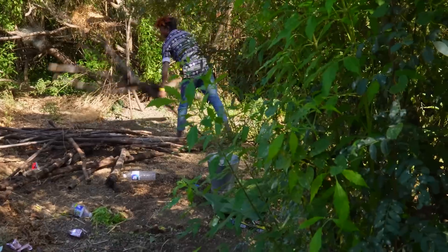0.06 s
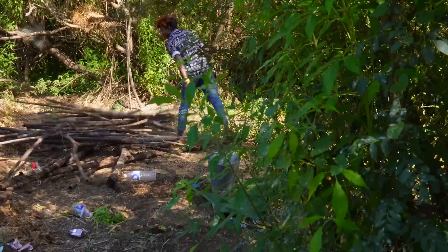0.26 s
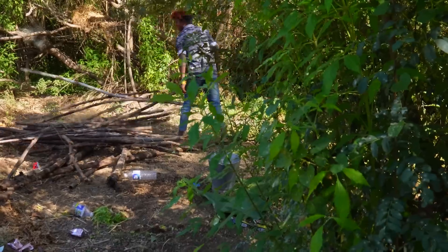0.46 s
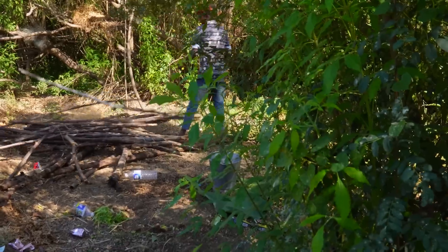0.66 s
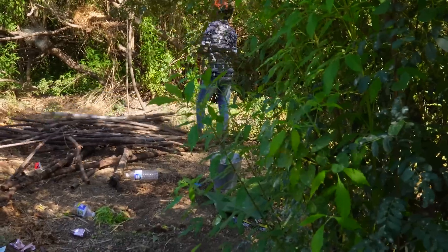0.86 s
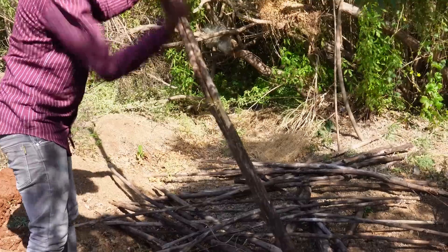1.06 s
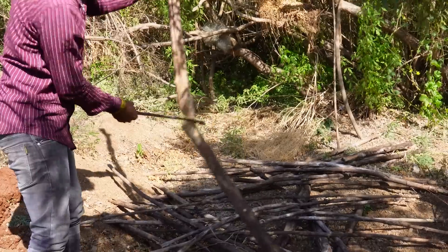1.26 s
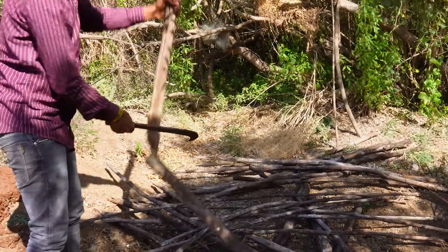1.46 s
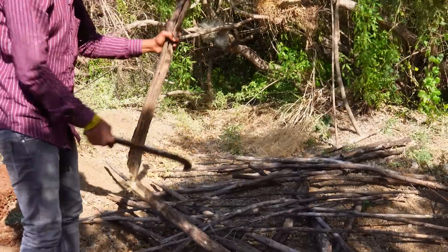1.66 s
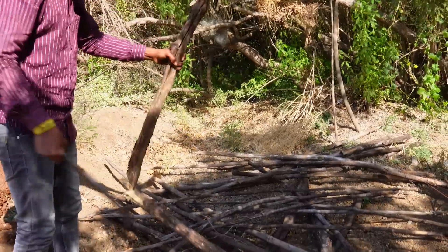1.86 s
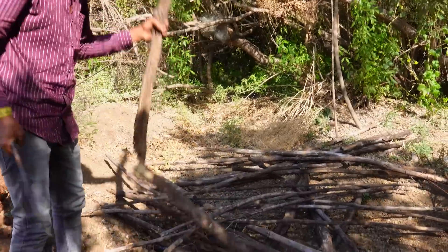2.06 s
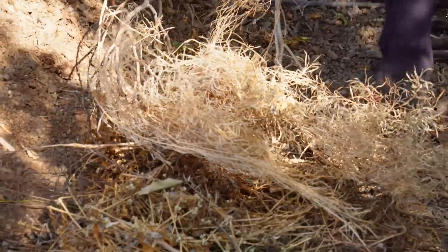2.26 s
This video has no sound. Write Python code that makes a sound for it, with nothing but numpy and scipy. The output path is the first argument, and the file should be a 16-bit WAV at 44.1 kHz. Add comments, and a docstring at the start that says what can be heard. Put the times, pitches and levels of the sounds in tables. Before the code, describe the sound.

Wooden poles clattering onto a heap, followed by one sharp, splintering chop.

```python
"""Dry branches land on a woodpile some metres away: poles knock, bounce and settle, twigs crackle.
Each contact rings a stick's bending modes and the pile beneath. The scene jumps close to a billhook
biting into a standing branch, which rings, cracks, tears and sheds splinters over stirring leaves and
faint distant notes, then jumps to a quiet patch of straw. Trees scatter the knocks and cracks back."""
import sys
import numpy as np
from scipy import signal
from scipy.fft import rfft, irfft
from scipy.io import wavfile
from scipy.ndimage import uniform_filter1d, minimum_filter1d

SR = 44100
rng = np.random.default_rng(int(sys.argv[2]) if len(sys.argv) > 2 else 0)


def wav_out(sig):
    """Save sig, one row per channel (or a flat mono array), as 16-bit PCM at SR to the path in sys.argv[1]."""
    wavfile.write(sys.argv[1], SR, np.round(np.clip(np.atleast_2d(sig).T, -1, 1) * 32767).astype(np.int16))


N = 101429
CHOP_SCENE_S, STRAW_SCENE_S = 1.021, 2.146

# poles landing (time [s], level [dB], hollow bass [dB], treble [dB], bounce length [s])
POLE_KNOCKS = [(0.069, -33, -12, 7.5, 0.019), (.188, -23.5, -27, 5, 0.012), (.219, -20.5, -10.5, -8, .008),
               (.225, -13.5, -16.5, 8, .012), (.237, -17, -16, -12, .004), (.268, -11.5, -7.5, 0, .012),
               (.278, -9.5, -1, -8, .012), (.289, -27, -9, 9, 0.007), (.303, -16.5, -12.5, 8, .012),
               (0.321, -22, 3.5, 15, 0.0047), (.344, -17.5, -8, 4, 0.016), (0.374, -17.5, -3, -8, .014),
               (.427, -40, 7, 1, 0.0082), (.434, -17.5, 1.5, -35, 0.0072), (.451, -18, 15, 9, 0.017),
               (.486, -20, -1.5, -37, 0.0072), (0.547, -19, -6, 0.5, 0.0037), (.565, -23.5, 6, 6.5, 0.007),
               (.607, -24, 16, 27, 0.0088), (0.625, -20, 2.5, 7, 0.016), (0.716, -21.5, 4.5, 1.5, .014),
               (0.76, -28.5, 13, -28, 0.0058), (0.776, -29.5, 14, -23, 0.0035),
               (.809, -23, 4, 11.5, 0.0089), (.826, -19.5, -3, 2, .02), (.842, -15, 4.5, -26, .016),
               (.973, -32, 8.5, -6, .01)]
# small contacts (time [s], stick clatter [dB], twig crackle [dB])
HEAP_SETTLING = [(0, -76, -70.5), (.07, -54.5, -65), (.18, -58.5, -58.5), (.215, -33, -36),
                 (.266, -26.5, -32), (.28, -19.5, -22), (.33, -18.5, -23), (.41, -27, -27.5),
                 (.47, -25.5, -30), (.535, -31, -38), (.63, -32.5, -31), (.69, -37.5, -33),
                 (.805, -41, -42), (.855, -32.5, -25), (.905, -40.5, -40), (1.02, -48, -47.5)]
# woodpile spectrum (frequency [Hz], gain [dB])
PILE_SPECTRUM = [(40, -59), (130, -57), (200, -32.5), (400, -23), (620, -12), (800, -1.5), (1100, 1),
                 (1650, 6.5), (1900, 0.5), (2250, 4), (3500, -2.5), (6300, -15.5), (10300, -28),
                 (16000, -41)]
# twig spectrum (frequency [Hz], gain [dB])
TWIG_SPECTRUM = [(100, -52), (1500, -6), (3500, 1), (5000, -3), (8000, -10.5), (12000, -21.5), (16000, -35)]


def thrown_branches(count=64):
    """Poles strike and bounce; lesser sticks clatter and twigs crackle as the heap settles."""
    sticks = [stick_contact() for _ in range(count)]
    wood = unit(response(PILE_SPECTRUM))
    knocks, clatter = np.zeros(N), np.zeros(N)
    for s, db, bass_db, treble_db, bounce_s in POLE_KNOCKS:
        first, *bounces = rng.integers(count, size=4)
        lags_s = (np.arange(3) + rng.random(size=3)) / 3 * bounce_s
        knock = sticks[first].copy()
        for bounce, lag_s in zip(bounces, lags_s):
            knock += undb(-4.5) * np.pad(sticks[bounce], (int(lag_s * SR), 0))[:len(knock)]
        tone = response([(450, bass_db), (900, bass_db / 2), (1600, 0), (2400, 0), (5500, treble_db)])
        add(knocks, s, blow(convolve(convolve(knock, wood), tone), db))
    contacts = grains(per_s=300, scatter_db=3.3) * undb(curve(HEAP_SETTLING))
    which = rng.integers(count, size=N)
    for i in np.flatnonzero(contacts):
        add(clatter, i / SR, contacts[i] * sticks[which[i]])
    crackle = grains(per_s=1500, scatter_db=2) * undb(curve(HEAP_SETTLING, column=2))
    twigs = convolve(crackle, unit(response(TWIG_SPECTRUM)))
    heap = knocks + convolve(clatter, wood) + twigs
    return trees(heap, far_db=-14.5, far_t60_s=.62, near_db=-9, near_t60_s=.09)


# woodpile modes (frequency [Hz], level [dB])
PILE_RESONANCES = [(490, 1.5), (867, -0.5), (1032, -6.5), (1104, 8), (1221, -8.5), (1303, -19), (1500, 1.5),
                   (1713, 6.5), (2160, 15), (2236, -9), (2691, -13), (2765, 11.5), (2966, 0), (3105, 0.5)]


def stick_contact():
    """A stick of random size rings in its bending modes, with the pile beneath, a click and scraping bark."""
    order = np.arange(3, 15) + .5
    stick_hz = np.minimum(22.03 * 2 ** rng.uniform(-.8, .803) * order ** 2, SR / 2)
    stick_gain = rng.standard_normal(len(order)) * np.sqrt(stick_hz) / (1 + (stick_hz / 4500) ** 2)
    bending = ring(stick_hz, stick_gain, t60_s=.056 * np.sqrt(1500 / stick_hz))
    pile_hz, pile_db = np.array(PILE_RESONANCES).T
    pile_gain = rng.standard_normal(len(pile_hz)) * undb(pile_db)
    pile = ring(pile_hz, pile_gain, t60_s=.11 * np.sqrt(1500 / pile_hz))
    bark_tone = response([(1500, -16.5), (4500, 1), (9000, 1.5), (16000, -3.5)])
    bark = unit(convolve(burst(t60_s=.045), bark_tone))
    click = burst(t60_s=.014)
    return unit(bending + undb(-12) * pile + undb(-11.5) * click + undb(1) * bark)


# blade bite, then cracks (time [s], level [dB], branch ring [dB], treble [dB])
BRANCH_CRACKS = [(1.1896, -16.5, -22.5, 3), (1.2065, -18, -27.5, 3), (1.2523, -6.5, -37, -1),
                 (1.274, -24, -50, 6), (1.3215, -30.5, -71, 7), (1.354, -37, -57, -19),
                 (1.3817, -31.5, -65, 5.5), (1.3863, -34.5, -61, 0)]
# crack spectrum (frequency [Hz], gain [dB])
CRACK_SPECTRUM = [(50, -62.5), (130, -48.5), (300, -36), (700, -20.5), (1200, -12.5), (2300, -4.5),
                  (3300, -6), (4300, 2), (5200, -5), (7500, -12), (11000, -22.5), (16000, -31)]
# standing branch modes (frequency [Hz], level [dB], t60 [s])
BRANCH_RESONANCES = [(210, -9, .22), (335, -1, .06), (445, -4, .2), (640, -9, .06), (861, -1, .1),
                     (1060, -8, .2), (1157, 1, .1), (1420, -3, .1), (1637, -2, .07), (1814, -3, .06),
                     (2132, -3, .07), (2250, -2, .1), (2573, -6, .08), (2988, -4, .14)]
# faint after-ring of the wood (frequency [Hz], level [dB])
AFTER_RING_MODES = [(385, -21), (420, -15.5), (1045, -6), (1071, 0.5), (1190, -4), (1437, 0)]
# tearing fibres (time [s], level [dB])
FIBRE_TEARING = [(1.186, -62), (1.191, -34), (1.203, -32), (1.218, -24), (1.228, -18), (1.243, -19.5),
                 (1.25, -33), (1.27, -31.5), (1.29, -22.5), (1.32, -32.5), (1.35, -40.5), (1.41, -48.5),
                 (1.52, -64), (1.8, -79), (2.15, -87.5)]
# fibre spectrum (frequency [Hz], gain [dB])
FIBRE_SPECTRUM = [(100, -45), (500, -28), (1200, -15), (2500, -3), (4300, 0.5), (6000, -9), (9000, -13.5),
                  (12000, -21), (16000, -36)]


def chopped_branch():
    """The blade rings the branch; the wood splits in sharp cracks with fibres tearing in between."""
    hz, mode_db, t60_s = np.array(BRANCH_RESONANCES).T
    wood, out = unit(response(CRACK_SPECTRUM)), np.zeros(N)
    radiation = response([(40, -28), (120, -26), (220, -13), (5000, 15)])  # thin pole: little bass
    for s, db, ring_db, treble_db in BRANCH_CRACKS:
        split = undb(-5) * burst(t60_s=.0032) + burst(t60_s=.0022, hold_s=.0035)
        crack = convolve(convolve(split, wood), response([(3500, 0), (9000, treble_db)]))
        modes = ring(hz, undb(mode_db) * rng.choice([-1, 1], len(hz)), t60_s)
        add(out, s, blow(crack, db) + blow(convolve(modes, radiation), ring_db))
    after_hz, after_db = np.array(AFTER_RING_MODES).T
    after_ring = ring(after_hz, undb(after_db), t60_s=np.full(len(after_hz), 1.1), size=SR)
    add(out, BRANCH_CRACKS[0][0], blow(after_ring, db=-36.5))
    fibres = grains(per_s=7000, scatter_db=3.5) * undb(curve(FIBRE_TEARING))
    out += convolve(fibres, unit(response(FIBRE_SPECTRUM)))
    return trees(out, far_db=-21.5, far_t60_s=.9, near_db=-10.5, near_t60_s=.17)


# splinters and straw (time [s], level [dB], pitch [Hz])
DRY_SNAPS = [(1.342, -43, 4400), (1.4253, -43.5, 3740), (1.4594, -43.5, 3000), (1.4957, -45.5, 4000),
             (1.549, -46.5, 4280), (1.5864, -50.5, 6260), (1.6476, -50, 3400), (1.6926, -51.5, 2520),
             (1.7599, -50.5, 3580), (1.768, -52, 5000), (1.8299, -56, 6500), (1.855, -50.5, 4880),
             (1.8721, -48, 4220), (2.167, -58, 1510), (2.214, -56, 3500), (2.238, -59, 4000),
             (2.281, -59.5, 1290)]


def splinters():
    """Splinters and straw snap singly, each a noise burst with its own pitch."""
    out = np.zeros(N)
    for s, db, hz in DRY_SNAPS:
        tone = response([(100, -42), (hz / 8, -27), (hz / 3, -11), (hz, 0), (hz * 2, -11), (16000, -29)])
        add(out, s, blow(convolve(burst(t60_s=.019), tone), db))
    return trees(out, far_db=-20, far_t60_s=.46, near_db=-2.5, near_t60_s=.14)


# leaves stirring (time [s], level [dB])
LEAF_RUSTLE = [(1.3, -80), (1.45, -56), (1.7, -59), (1.82, -63), (1.93, -68), (1.98, -59), (2.0, -47),
               (2.04, -58), (2.07, -62), (2.105, -55), (2.15, -61)]
# leaf spectrum (frequency [Hz], gain [dB])
LEAF_SPECTRUM = [(100, -32), (600, -27), (1300, -13.5), (1900, -13.5), (2800, -3), (4600, -7),
                 (6500, -16.5), (10000, -29.5), (16000, -40)]


def dry_leaves():
    """Leaves stir underfoot in a soft rustle of tiny clicks."""
    clicks = grains(per_s=4600, scatter_db=3.1) * undb(curve(LEAF_RUSTLE))
    return convolve(clicks, unit(response(LEAF_SPECTRUM)))


# distant notes (start [s], length [s], pitch [Hz], level [dB], third harmonic re fundamental [dB])
CALL_NOTES = [(1.0, .19, 1870, -63, -30), (1.96, .08, 692, -60, -14), (2.015, .075, 690, -66, 6),
              (2.045, .1, 810, -63, -14)]


def distant_call():
    """Thin, rough notes far away, each swelling and fading."""
    out = np.zeros(N)
    for s, length_s, hz, db, third_db in CALL_NOTES:
        waver = .25 * uniform_filter1d(rng.standard_normal(N), size=60)[:int(length_s * SR)]
        phase = 2 * np.pi * np.cumsum(hz * (1 + waver)) / SR
        note = np.sin(phase) + undb(third_db) * np.sin(3 * phase)
        add(out, s, undb(db) * np.hanning(len(note)) * note)
    return out


# air at the woodpile (frequency [Hz], gain [dB])
AIR_AT_PILE = [(24, -106), (40, -70.5), (345, -36), (542, -42), (615, -25.5), (715, -11), (1090, -5.5),
               (1270, -13.5), (2000, -14.5), (2380, -31.5), (5310, -49), (16000, -64)]
# air at the standing branch (frequency [Hz], gain [dB])
AIR_AT_BRANCH = [(24, -52), (40, -44), (516, -26), (873, -18.5), (1090, -14), (1900, -9), (3650, -10),
                 (4130, -17), (4570, -10.5), (5310, -17.5), (8990, -21.5), (16000, -43)]
# air at the straw (frequency [Hz], gain [dB])
AIR_AT_STRAW = [(24, -46), (40, -18), (372, -9), (556, -11), (663, -1), (1210, -2.5), (1850, -14),
                (2570, -5), (2980, -10.5), (6330, -11.5), (8340, -24), (16000, -27)]


def air(spectrum, db):
    """Steady noise of distant leaves and open air."""
    return convolve(rng.standard_normal(N), unit(response(spectrum))) * undb(db)


def trees(x, far_db, far_t60_s, near_db, near_t60_s):
    """Quick scatter from brush and a longer, duller echo from trunks; paths shift from hit to hit."""
    t = np.arange(N) / SR
    paths = grains(per_s=5000, scatter_db=3)
    trunk_tone = response([(150, 4), (1000, -4.5), (3000, -8), (7000, -17), (15000, -5)])
    far = convolve(paths * fade(t, far_t60_s) * (1 - np.exp(-t / .043)), trunk_tone)
    near = paths[::-1] * fade(t, near_t60_s) * (t > .002)
    polarity = np.repeat(rng.choice([-1., 1.], N // 800), 900)[:N]
    shift = uniform_filter1d(uniform_filter1d(polarity, size=300), size=150)
    return x + convolve(x * shift, undb(far_db) * unit(far) + undb(near_db) * unit(near))


def undb(db):
    return 10 ** (np.asarray(db) / 20)


def unit(x):
    """Scale to unit energy."""
    return x / np.sqrt(np.sum(x ** 2) + 1e-18)


def fade(t, t60_s):
    return np.exp(-np.log(1000) * t / t60_s)


def curve(table, column=1):
    """One table column, linearly interpolated in time."""
    rows = np.array(table)
    return np.interp(np.arange(N) / SR, rows[:, 0], rows[:, column])


def add(out, s, x):
    """Mix x in at s seconds."""
    i = int(np.clip(s * SR, 0, N - 1))
    out[i:i + len(x)] += x[:N - i]


def convolve(x, h):
    return signal.fftconvolve(x, h)[:len(x)]


def response(points, size=2048):
    """Minimum-phase impulse response from (frequency [Hz], gain [dB]) points."""
    hz, db = np.array(points).T
    bin_hz = np.maximum(np.arange(size // 2 + 1) * SR / size, 1)
    gain = undb(np.interp(np.log(bin_hz), np.log(hz), db))
    cepstrum = irfft(np.log(gain))
    cepstrum[1:size // 2] *= 2
    cepstrum[size // 2 + 1:] = 0
    return irfft(np.exp(rfft(cepstrum)))


def blow(x, db):
    """Scale to the energy of 10 ms at this level."""
    return unit(x) * undb(db) * np.sqrt(.01 * SR)


def ring(hz, gain, t60_s, size=8192):
    """Sum of decaying modes."""
    t = np.arange(size) / SR
    return unit(gain @ (np.sin(2 * np.pi * hz[:, None] * t) * fade(t, t60_s[:, None])))


def burst(t60_s, hold_s=0, size=8192):
    """Noise that holds, then decays."""
    decay_time = np.maximum(np.arange(size) / SR - hold_s, 0)
    return unit(rng.standard_normal(size) * fade(decay_time, t60_s))


def grains(per_s, scatter_db):
    """Random clicks of uneven size, levelled towards unit power."""
    clicks = (rng.random(N) < per_s / SR) * rng.choice([-1, 1], N)
    clicks = clicks * undb(scatter_db * rng.standard_normal(N))
    power = np.abs(uniform_filter1d(clicks ** 2, size=900))
    return clicks / np.sqrt(power + .003)


# stereo width (frequency [Hz], side re mid [dB])
STEREO_WIDTH = [(30, -31), (250, -36), (600, -25.5), (1000, -41), (2000, -25), (4000, -10), (8000, -7.5),
                (14000, -1)]


def scene():
    """Three spots in turn; bass central, treble scattered from side to side."""
    t = np.arange(N) / SR
    at_pile = uniform_filter1d((t < CHOP_SCENE_S) * 1., size=64)
    at_straw = uniform_filter1d((t > STRAW_SCENE_S) * 1., size=64)
    at_branch = 1 - at_pile - at_straw
    pile = thrown_branches() + air(AIR_AT_PILE, db=-54)
    branch = chopped_branch() + dry_leaves() + distant_call() + air(AIR_AT_BRANCH, db=-58)
    straw = air(AIR_AT_STRAW, db=-58)
    mid = at_pile * pile + at_branch * branch + at_straw * straw + splinters()
    direction = uniform_filter1d(np.repeat(rng.choice([-1., 1.], N), 90)[:N], size=30)
    side = convolve(np.roll(mid * direction, 12), response(STEREO_WIDTH))
    return np.array([mid + side, mid - side])


def record(dry):
    """Fast peak limiter, then a steep low-pass."""
    ceiling, top_hz = .82, 15900
    gain = np.minimum(1, ceiling / (np.abs(dry).max(axis=0) + 1e-9))
    gain = minimum_filter1d(gain, size=81)
    gain = uniform_filter1d(uniform_filter1d(gain, size=41), size=41)
    return signal.sosfilt(signal.ellip(10, .1, 80, top_hz, fs=SR, output="sos"), dry * gain)


dry = scene()
out = record(dry)
wav_out(out)
```